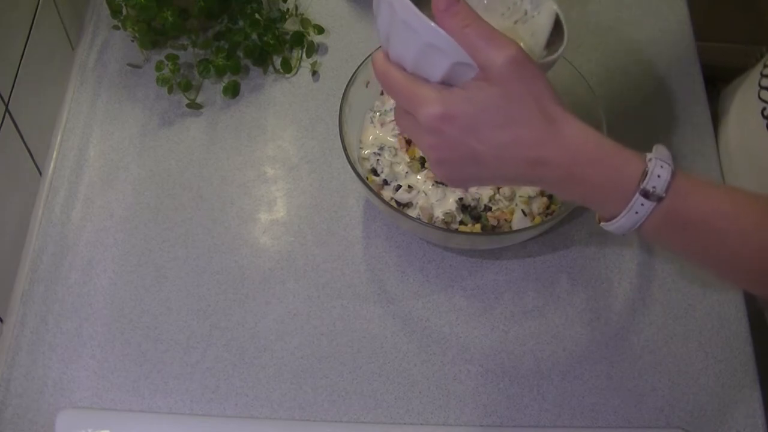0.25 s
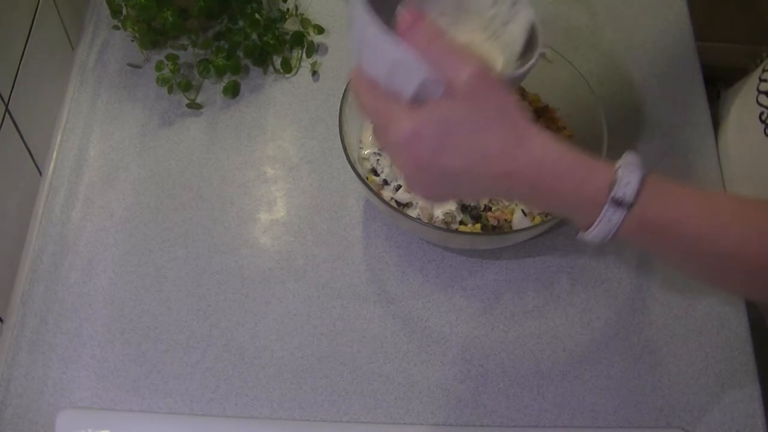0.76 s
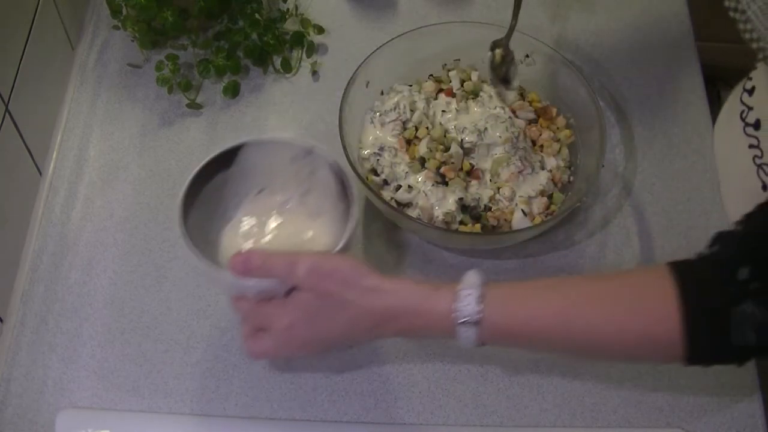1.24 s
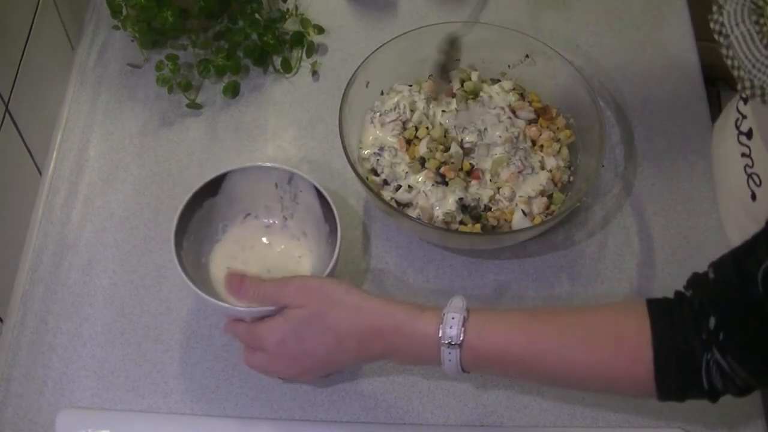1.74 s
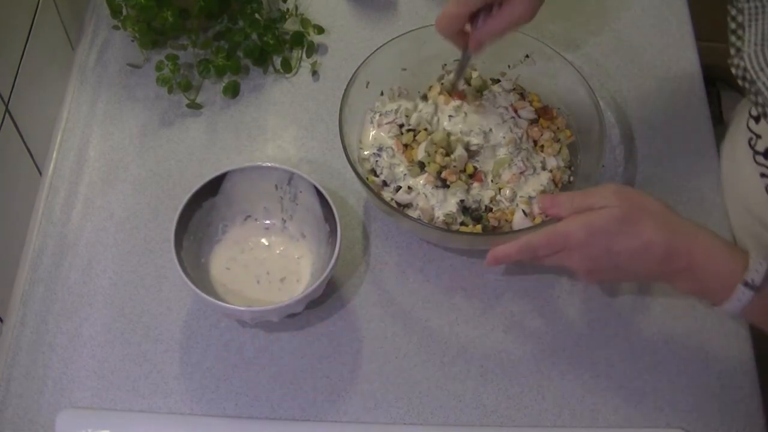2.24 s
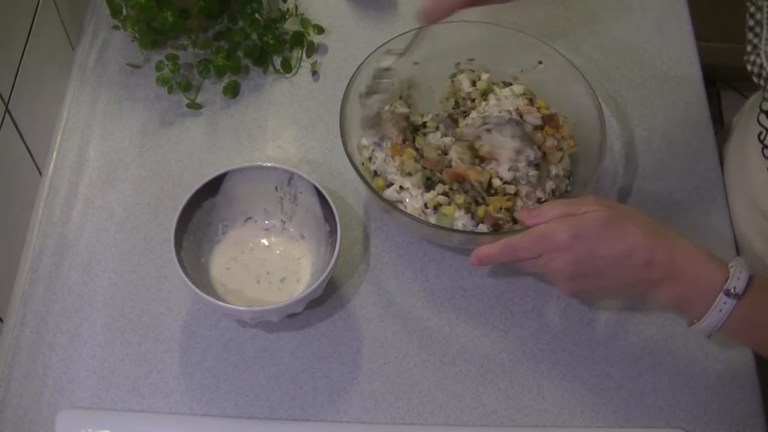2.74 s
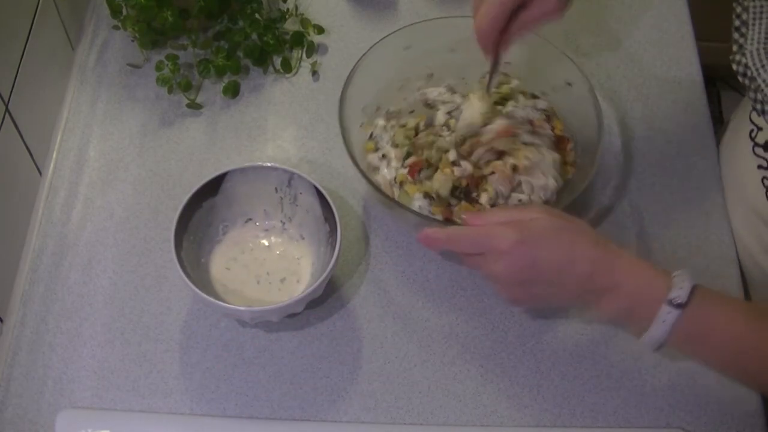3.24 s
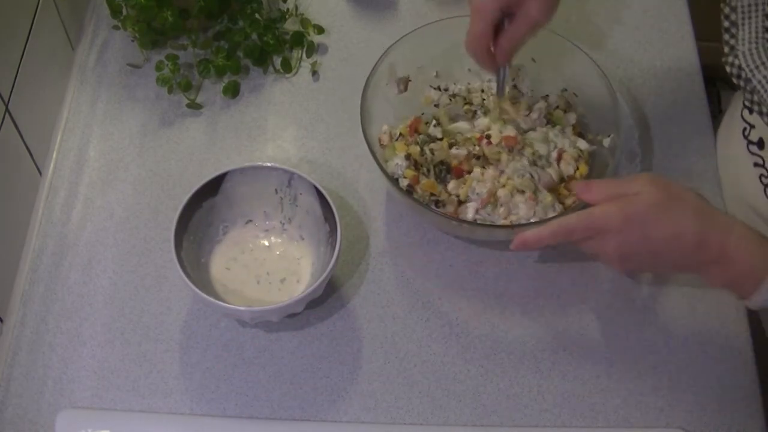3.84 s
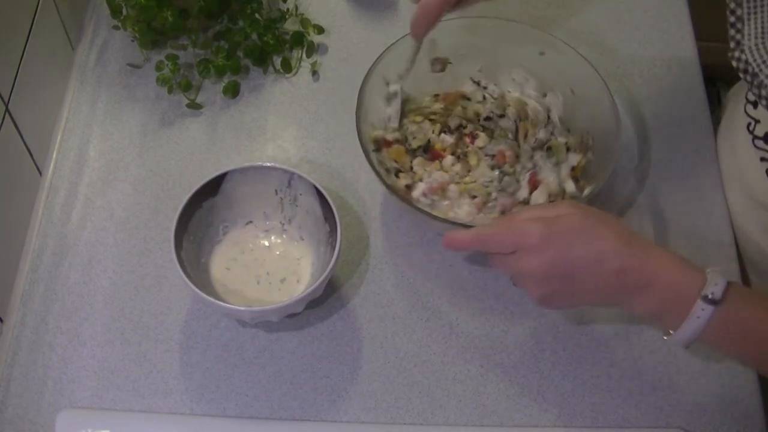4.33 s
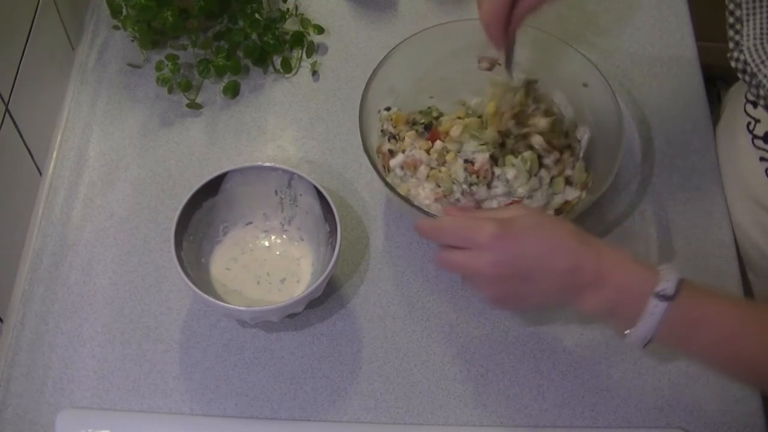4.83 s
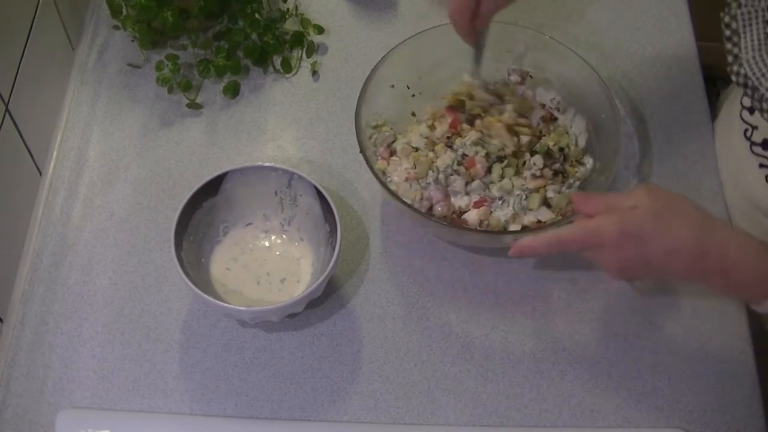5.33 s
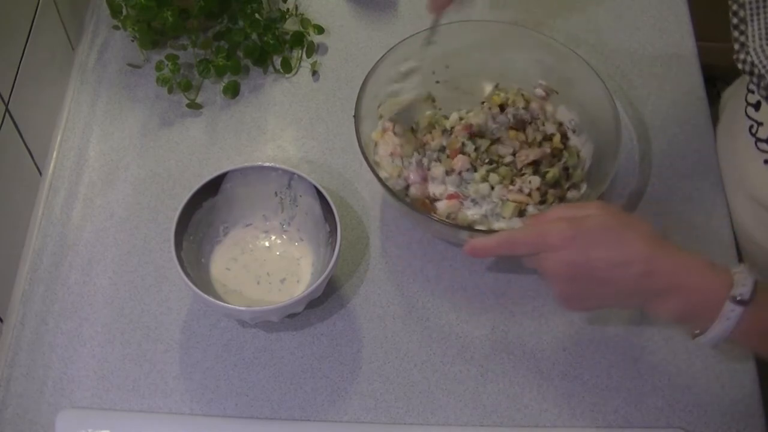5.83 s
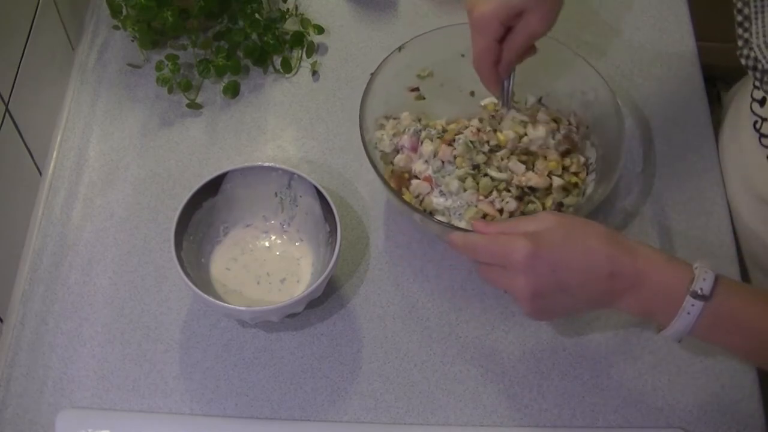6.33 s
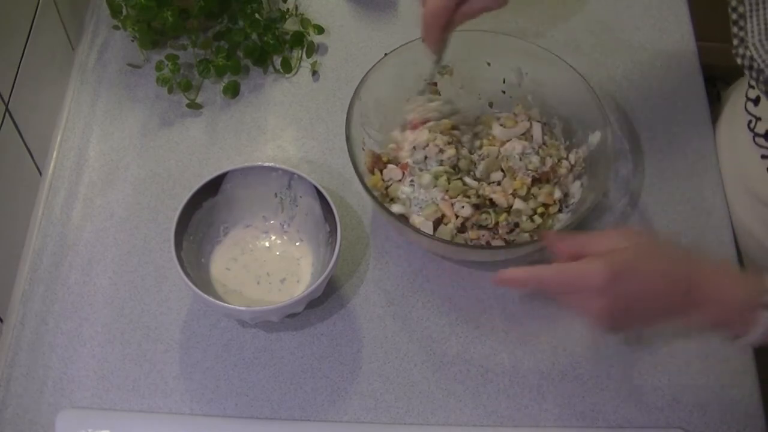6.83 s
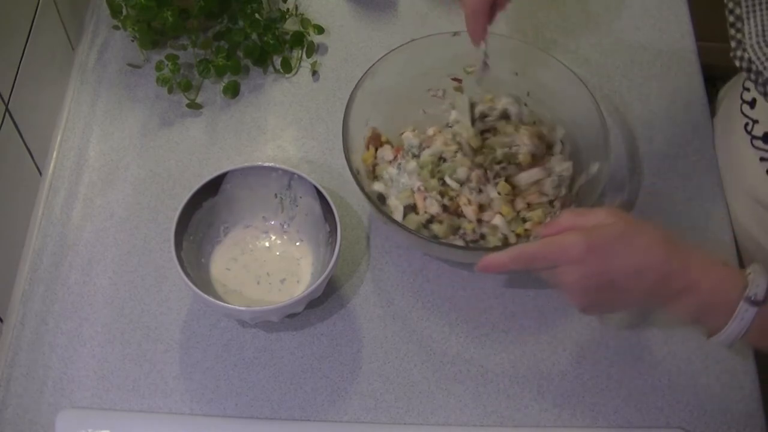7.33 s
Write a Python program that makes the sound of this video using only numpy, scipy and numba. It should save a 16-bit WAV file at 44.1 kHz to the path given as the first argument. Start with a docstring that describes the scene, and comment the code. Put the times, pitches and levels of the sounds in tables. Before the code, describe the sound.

At about 0.6 seconds a metal spoon taps a sauce bowl several times in quick succession, with a short ring, followed by two faint ticks. At 1.6 seconds the bowl lands and rocks on the worktop: two firm hollow knocks and a softer third. From 1.9 seconds the spoon stirs chopped salad in a glass bowl. Ringing clinks come at 1.9 and, faintly, 3.5 seconds, then more strongly at 4.4, 5.2 and 6.7 seconds, with dry ticks between them. The spoon scrapes down the glass in short, rasping squeals that fall in pitch, around 2.2, 2.9, 3.8, 4.4, 5.2, 6.0 and 6.9 seconds; the one at 6 seconds is longest and full of clicks. The wet salad squelches softly with each turned spoonful until the end, near 7.7 seconds. Everything sounds fairly close, with short, bright kitchen reverberation and faint microphone hiss.

```python
"""A chopped salad is dressed and stirred in a glass bowl in a bright-sounding kitchen.
First a metal spoon taps the sauce bowl, which rings; at 1.6 s that bowl lands and rocks on the worktop.
From 1.9 s the spoon stirs: it clinks on the glass and scrapes down the wall in stick-slip,
its squeal sinking as it digs in. Between strokes the wet salad squelches."""
import sys
import numpy as np
from scipy import signal
from scipy.fft import rfft, irfft, next_fast_len
from scipy.io import wavfile
from scipy.ndimage import uniform_filter1d
from numba import njit

SR = 44100
rng = np.random.default_rng(int(sys.argv[2]) if len(sys.argv) > 2 else 0)


def unload_audio(sound):
    """Save the sound as a 16-bit wav file, at the path given as the first command line argument."""
    columns = np.transpose(np.atleast_2d(sound))
    # keep every value between -1 and 1, then stretch to whole-number steps
    steps = np.round(np.clip(columns, -1, 1) * 32767)
    wavfile.write(sys.argv[1], SR, steps.astype(np.int16))


N = 333837
TIME_S = np.arange(N) / SR
RING_TIME_S = TIME_S[:SR * 3 // 4]

# spoon on sauce bowl: start_s, ring_db, ring_tilt_db_per_oct, t60_ratio, crack_db, crack_tilt_db_per_oct
SAUCE_TAPS = [(0.6105, -21.5, -14, .9, -6.5, -0.5), (0.7022, -25, 0.5, 1.0, -14, -3),
              (0.753, -39, 6.5, .9, -17, -5), (0.768, -36, 5.5, .8, -21, 4)]
# spoon clinks on the glass bowl; the last row is the previous clink's ring swelling again:
# start_s, ring_db, ring_tilt_db_per_oct, t60_ratio, crack_db, crack_tilt_db_per_oct
GLASS_RINGS = [(1.9189, -24.5, -13.5, .65, -9.5, -9), (3.5421, -33.5, -4, .8, -13, 1.5),
               (4.3528, -14, -2.5, .6, -0.5, 7.5), (5.1513, -20, -2, .6, -5, 6.5),
               (6.7435, -16.5, 4, .7, 0, 7), (6.798, -19, -0.5, .7, -42, 5)]
# sauce bowl landing and rocking: start_s, level_db, tilt_db_per_oct
KNOCKS = [(1.6476, 7.5, -0.5), (1.7114, 7.5, -2), (1.789, -2.5, -2.5)]
# spoon contact spectrum: freq_hz, level_db
TICK_SPECTRUM = [(40, -43.5), (130, -64), (350, -22.5), (950, -21), (1320, -6.5), (2100, 3.5), (3000, 10),
                 (4000, 5), (5600, 2.5), (6700, -11), (8000, -5.5), (9500, -20), (11000, -17), (15500, -30)]


def from_db(db):
    """Decibels to gain."""
    return 10 ** (np.asarray(db) / 20)


def rms_one(x):
    """Scale to rms 1."""
    return x / np.sqrt(np.mean(x ** 2) + 1e-20)


def at_hz(points, hz):
    """Read a spectrum on a log-frequency axis."""
    freq_hz, value = np.transpose(points)
    return np.interp(np.log(hz + 1e-9), np.log(freq_hz), value)


def add(track, start_s, sound):
    """Mix a sound in at start_s."""
    start = round(start_s * SR)
    track[start:start + len(sound)] += sound[:N - start]


def colour(x, points, tilt_db_per_oct=0, size=4096):
    """Minimum-phase filter of unit energy with the given spectrum and tilt."""
    hz = np.maximum(np.fft.rfftfreq(size, 1 / SR), 10)
    cepstrum = irfft(np.log(from_db(at_hz(points, hz) + tilt_db_per_oct * np.log2(hz))))
    cepstrum[size // 2:] = 0
    cepstrum[0] = 0
    response = irfft(np.exp(2 * rfft(cepstrum)))
    return signal.fftconvolve(x, response / np.linalg.norm(response))[:len(x)]


def equalise(x, points):
    """Zero-phase gain in dB by frequency."""
    size = next_fast_len(len(x))
    gain = from_db(at_hz(points, np.fft.rfftfreq(size, 1 / SR)))
    return irfft(rfft(x, size) * gain, size)[:len(x)]


def low_cut(x, hz):
    """High-pass: keeps the bass out of a sound."""
    return signal.sosfilt(signal.butter(2, hz, "high", fs=SR, output="sos"), x)


def held(start_s, length_s, attack_s, release_s):
    """Attack, hold and release of height 1."""
    age_s = TIME_S - start_s
    return np.clip(age_s / attack_s, 0, 1) * np.clip(1 - (age_s - length_s) / release_s, 0, 1)


def wander(hz):
    """Random drift below hz, rms 1."""
    return rms_one(signal.sosfilt(signal.butter(2, hz, fs=SR, output="sos"), rng.standard_normal(N)))


def grains(per_s, spread_db):
    """Random clicks of unequal size, rms 1."""
    sizes = from_db(spread_db * np.minimum(rng.exponential(1, N), 4)) * rng.choice([-1, 1], N)
    return rms_one(sizes * (rng.random(N) < per_s / SR))


def evened(x, window_s):
    """Hold the slow level at 1, keep the fine grain."""
    return x / np.sqrt(np.abs(uniform_filter1d(x ** 2, int(window_s * SR))) + 1e-12)


@njit
def gliding_resonance(x, hz, width_hz):
    """Two-pole resonance with a moving centre."""
    out, state = np.zeros(len(x)), 0j
    for i in range(len(x)):
        state = state * np.exp((2j * np.pi * hz[i] - np.pi * width_hz) / SR) + x[i]
        out[i] = state.real
    return out


def ringing(onsets, modes, pivot_hz, vary_db):
    """Each onset rings all modes, with its own decay and its own tilt above pivot_hz."""
    out = np.zeros(N)
    hz, mode_db, t60_s = np.transpose(modes)[:, :, None]
    octaves = np.log2(np.maximum(hz / pivot_hz, 1))
    for start_s, level_db, tilt_db_per_oct, t60_ratio, *_ in onsets:
        gain_db = level_db + mode_db + tilt_db_per_oct * octaves + vary_db * rng.standard_normal(hz.shape)
        waves = rng.choice([-1, 1], hz.shape) * np.sin(2 * np.pi * hz * RING_TIME_S)
        decay_db = 60 * RING_TIME_S / (t60_s * t60_ratio)
        add(out, start_s, np.sum(waves * from_db(gain_db - decay_db), axis=0))
    return out


def contacts(blows, spectrum, rattle_db, rattle_t60_s):
    """A sharp crack, then the brief jangle of many damped modes."""
    out = np.zeros(N)
    for start_s, level_db, tilt_db_per_oct in blows:
        burst = rng.standard_normal(len(RING_TIME_S)) * from_db(-60 * RING_TIME_S / rattle_t60_s)
        burst = from_db(rattle_db) * burst / np.linalg.norm(burst)
        burst[0] = 1   # the crack
        add(out, start_s, from_db(level_db) * colour(burst, spectrum, tilt_db_per_oct))
    return out


def microphone_hiss(level_db):
    """Each microphone adds its own faint noise."""
    # noise floor: freq_hz, level_db
    hiss_spectrum = [(15, -32), (25, -33), (126, -21), (233, -6.5), (322, -11.5), (359, -1.5), (410, -11),
                     (804, -15), (970, -16), (1110, -13.5), (1490, -14.5), (2300, -6.5), (2560, -3.5),
                     (3440, -10), (15500, -21.5)]
    return from_db(level_db) * np.array([colour(white, hiss_spectrum)
                                         for white in rng.standard_normal((2, N))])


def diffuse(mid, side):
    """Sound from all around: alike at both microphones in the midrange, less so in the treble."""
    # stereo width: freq_hz, side_over_mid_db
    width = [(40, 0.5), (130, -13), (300, -11.5), (1000, -12), (2500, -12.5), (5000, -4), (8000, -3.5),
             (14000, -2.5)]
    side = equalise(side, width)
    return np.array([mid + side, mid - side])


def kitchen(x, wet_db, build_s=0.00043, gap_s=0.0027):
    """Direct sound plus a dense tail from hard walls that dies sooner in the treble."""
    # room decay before the final taper: freq_hz, t60_s
    room_decay = [(150, 0.31), (500, 0.77), (1500, 0.6), (3000, 0.45), (8000, 0.36), (15000, 0.14)]
    centres_hz, t60s_s = np.transpose(room_decay)
    size = len(RING_TIME_S)
    hz = np.fft.rfftfreq(size, 1 / SR)
    noise = rfft(diffuse(*rng.standard_normal((2, size))))
    tail = sum(irfft(noise * np.interp(hz, centres_hz, band), size) * from_db(-60 * RING_TIME_S / t60_s)
               for band, t60_s in zip(np.eye(len(centres_hz)), t60s_s))
    onset = 1 - np.exp(-np.maximum(RING_TIME_S - gap_s, 0) / build_s)
    spectrum = rfft(tail * onset)
    # densely overlapping room modes favour no pitch
    power = uniform_filter1d(np.abs(spectrum.mean(axis=0)) ** 2, size=18)
    taper = (RING_TIME_S > gap_s) * (1 - RING_TIME_S / RING_TIME_S[-1]) ** 2
    tail = irfft(spectrum / np.sqrt(power), size) * taper
    tail /= np.linalg.norm(tail.mean(axis=0))
    return x + from_db(wet_db) * signal.fftconvolve(x[None], tail, axes=1)[:, :len(x)]


def salad(smack_db, tumble_db, stir_db=-55, settle_db=-59.5):
    """Sauce films part in clusters of tiny smacks, soft pieces tumble; both swell with each spoonful."""
    # spoon in the salad: start_s, end_s
    stirs = [(1.95, 2.37), (2.778, 9)]
    # spoonfuls lifted and turned: start_s, length_s, level_db
    folds = [(2.04, 0.36, -44), (3.191, 0.36, -43), (4.075, 0.46, -49), (4.913, .14, -44.5),
             (5.776, 0.44, -49.5), (6.49, 0.15, -46.5), (7.37, 0.28, -48)]
    # wet smacks: freq_hz, level_db
    smack_spectrum = [(59, -35), (100, -41), (214, -32.5), (275, -23), (378, -11.5), (467, -5.5),
                      (530, -2.5), (1310, -3.5), (1960, 3), (2810, 2.5), (4190, -5), (5510, -4),
                      (15500, -36)]
    # soft bumps: freq_hz, level_db
    bump_spectrum = [(100, -42), (200, -1.5), (420, 5.5), (800, 1), (1500, 2), (4000, -15.5)]
    stirring = sum(held(start_s, end_s - start_s, attack_s=0.022, release_s=0.022)
                   for start_s, end_s in stirs)
    folding = sum(from_db(level_db) * held(start_s, length_s, attack_s=0.056, release_s=0.1)
                  for start_s, length_s, level_db in folds)
    motion = np.hypot(from_db(settle_db) + from_db(stir_db) * stirring, folding)
    clusters = from_db(2 * wander(hz=22))
    smacks = clusters * colour(grains(per_s=1100, spread_db=1.5), smack_spectrum)
    bumps = colour(grains(per_s=300, spread_db=1.5), bump_spectrum)
    tumbling = stirring * (motion / from_db(stir_db)) ** 0.34   # a third of the smacks' swing in dB
    return from_db(smack_db) * motion * smacks + from_db(tumble_db) * tumbling * bumps


def worktop_boom():
    """The worktop rings hollow under each knock."""
    # worktop modes: freq_hz, level_db, t60_s
    modes = [(196.5, -12, 0.23), (256, -8.5, .18), (334, -1.5, 0.19), (405, 3, 0.17), (511, 2.5, 0.18),
             (644, -1, .16), (749, 3, 0.18), (910, 2, .16), (960, 1, .16), (1100, -4, .14)]
    blows = [(start_s, level_db - 40, tilt_db_per_oct, 1) for start_s, level_db, tilt_db_per_oct in KNOCKS]
    return low_cut(ringing(blows, modes, pivot_hz=600, vary_db=1), hz=220)


def sauce_bowl_knocks():
    """The sauce bowl lands and rocks on the worktop."""
    # knock spectrum: freq_hz, level_db
    knock_spectrum = [(53, -60), (90, -34.5), (135, -40.5), (186, -13), (274, -16.5), (332, -5),
                      (468, -12.5), (631, -1), (688, -8.5), (889, 0.5), (1650, -3.5), (2760, 0),
                      (3350, -11.5), (6370, -20), (15000, -49)]
    return contacts(KNOCKS, knock_spectrum, rattle_db=-1, rattle_t60_s=0.012)


def sauce_bowl_ring():
    """The sauce bowl rings under the spoon's taps."""
    # sauce bowl modes: freq_hz, level_db, t60_s
    modes = [(1179, -11, .2), (2229, -11, .13), (2487, -3, .12), (2600, -8, .1), (2961, 0, .12),
             (3040, -8, .1), (3820, -8, .1), (4651, -15, .08), (5310, -5, .18), (5390, -5, .13),
             (6821, -20, .08), (7350, -20, .1), (8200, -22, .12)]
    return low_cut(ringing(SAUCE_TAPS, modes, pivot_hz=2940, vary_db=3), hz=690)


def glass_bowl_ring():
    """The struck glass rings, damped by the spoon staying on it; the last ring swells again."""
    # glass bowl modes: freq_hz, level_db, t60_s
    modes = [(400, -26, .11), (900, -27, .08), (1090, -23, .2), (1838, -8, .27), (2630, -13, .08),
             (2770, 0, .25), (2800, -8, .13), (3600, -13, .09), (3850, -7, .22), (3900, -13, .1),
             (4220, -15, .08), (5040, -12, .24), (5110, -15, .18), (5620, -13, .12), (6400, -15, .22),
             (7290, -16, .14), (7960, -11, .12), (8420, -16, .1), (10800, -26, .07)]
    return low_cut(ringing(GLASS_RINGS, modes, pivot_hz=2400, vary_db=2.5), hz=266)


def spoon_ticks(gain_db):
    """Hard contacts of the spoon: dead catches, and the cracks where it strikes a bowl."""
    # catches that ring no bowl: start_s, level_db, tilt_db_per_oct
    catches = [(1.0286, -33, 4), (1.4103, -28, 13), (2.1617, -21.5, -5.5), (2.2594, -21, -2.5),
               (2.341, -11.5, -7), (2.5446, -33.5, 7), (2.8442, -22, 3), (2.9983, -8.5, -4),
               (3.0044, -3.5, -1.5), (3.678, -23, 1.5), (3.8149, -20.5, -3), (3.8482, -10, -2),
               (4.3582, -13, -7.5), (4.539, -17, 4), (4.6007, -8.5, -2.5), (4.689, -12.5, -2),
               (4.855, -27.5, -1), (5.9607, -17.5, 1), (6.0844, -9, -4), (6.123, -11, -4.5),
               (6.171, -9.5, -6.5), (6.2071, -12, -3.5), (6.2581, -3, -1), (6.316, -10, -5.5),
               (6.8862, -12, 0), (7.0515, -14.5, -1.5), (7.0807, -12, -6), (7.3364, -30, 5.5)]
    cracks = [(start_s, crack_db, tilt_db_per_oct)
              for start_s, *_, crack_db, tilt_db_per_oct in SAUCE_TAPS + GLASS_RINGS]
    ticks = contacts(catches + cracks, TICK_SPECTRUM, rattle_db=12, rattle_t60_s=0.028)
    return from_db(gain_db) * low_cut(ticks, hz=510)


def spoon_strokes(smother_db_per_oct=21, wobble_db=5.1, wobble_oct=0.049, wobble_hz=24):
    """Pitch, squeal gain, rasp gain: the squeal sinks and fades as the spoon digs in; the hand wobbles."""
    # slides down the glass: start_s, length_s, first_hz, last_hz, squeal_db, rasp_db, easing_db_per_s
    strokes = [(2.22, 0.16, 2010, 1490, -33.5, -43.5, 39), (2.835, 0.088, 2880, 2700, -38.5, -60, 21),
               (2.897, 0.1, 2240, 1980, -31, -38, 44), (3.78, 0.1, 2900, 2200, -37.5, -40, 12),
               (4.41, .14, 2670, 2230, -22.5, -34, 9), (4.63, 0.046, 2020, 1600, -43.5, -39.5, 68),
               (5.228, 0.18, 2690, 2180, -20, -30.5, 73), (5.41, .13, 1810, 1580, -42.5, -38.5, 54),
               (5.968, 0.068, 2890, 2720, -24, -41.5, 2), (6.02, 0.295, 2550, 1350, -25, -37.5, 5),
               (6.87, 0.11, 2520, 1960, -25.5, -37, 2), (7.0, 0.13, 2230, 1640, -32.5, -38, 13)]
    pitch_hz = np.full(N, float(strokes[0][2]))
    squeal, rasp = np.zeros((2, N))
    for start_s, length_s, first_hz, last_hz, squeal_db, rasp_db, easing_db_per_s in strokes:
        age_s = np.clip(TIME_S - start_s, 0, length_s)
        glide_hz = first_hz + (last_hz - first_hz) * age_s / length_s
        pitch_hz = np.where(TIME_S >= start_s, glide_hz, pitch_hz)
        eased_db = easing_db_per_s * age_s
        smother_db = smother_db_per_oct * np.log2(first_hz / glide_hz)
        # the tip sings first, then the edge bites
        tip = held(start_s, length_s, attack_s=0.015, release_s=0.02)
        edge = held(start_s, length_s, attack_s=0.038, release_s=0.02)
        squeal += from_db(squeal_db - eased_db - smother_db) * tip
        rasp += from_db(rasp_db - eased_db) * edge
    pressure = from_db(wobble_db * wander(wobble_hz))
    return pitch_hz * 2 ** (wobble_oct * wander(wobble_hz)), squeal * pressure, rasp * pressure


def spoon_scrapes(slips_per_s, unevenness, squeal_db, overtone_db, rasp_db, grit_db, swell_s=0.0009):
    """Stick-slip on the glass: each slip is a swell of friction that feeds two sinking resonances."""
    # edge rasping on glass: freq_hz, level_db
    rasp_spectrum = [(100, -54), (500, -41), (950, -1), (1350, -49.5), (2200, 13.5), (3100, 10),
                     (4200, 14.5), (5300, 6.5), (6500, -4.5), (7700, 8), (9400, -25), (10800, -7.5),
                     (12500, -36), (15500, -11)]
    pitch_hz, squeal_gain, rasp_gain = spoon_strokes()
    gap, strength, shift = rng.standard_normal((N // 20, 3)).T
    slip_samples = (np.cumsum(np.exp(unevenness * gap)) * SR / slips_per_s).astype(int)
    slips = np.bincount(np.minimum(slip_samples, N), from_db(2 * strength), N + 1)[:N]
    pitch_hz *= np.exp(0.035 * np.interp(np.arange(N), slip_samples, shift))   # each slip grips a new spot
    pole = np.exp(-1 / (swell_s * SR))
    friction = signal.lfilter([1], [1, -2 * pole, pole * pole], slips) * rng.standard_normal(N)
    low = high = friction
    for _ in range(2):   # two passes for steep skirts
        low = gliding_resonance(low, pitch_hz, width_hz=560.)
        high = gliding_resonance(high, 2.1 * pitch_hz, width_hz=620.)
    squeal = from_db(squeal_db) * squeal_gain * evened(low, window_s=0.011)
    overtone = from_db(overtone_db) * np.sqrt(squeal_gain * rasp_gain) * evened(high, window_s=0.031)
    rasp = from_db(rasp_db) * rasp_gain * evened(colour(friction, rasp_spectrum), window_s=0.029)
    # the edge catches now and then
    grit = from_db(grit_db) * rasp_gain * colour(grains(per_s=70, spread_db=-2), TICK_SPECTRUM)
    return squeal + overtone + rasp + grit


def scene():
    """All sources in the kitchen's reverberation, over microphone hiss."""
    taps = sauce_bowl_ring()
    glass = glass_bowl_ring()
    ticks = spoon_ticks(gain_db=-6)
    knocks = sauce_bowl_knocks()
    scrapes = spoon_scrapes(slips_per_s=230, unevenness=0.45,
                            squeal_db=-8.5, overtone_db=-13, rasp_db=-5.5, grit_db=-7.5)
    return (kitchen(taps, wet_db=-5.5) + kitchen(glass, wet_db=-2.5)
            + kitchen(ticks, wet_db=-1.5) + kitchen(scrapes, wet_db=-1.5)
            + kitchen(knocks, wet_db=2) + kitchen(worktop_boom(), wet_db=-4)
            + kitchen(salad(smack_db=-10, tumble_db=-69), wet_db=1.5)
            + microphone_hiss(level_db=-58.5))


def record(dry):
    """The left microphone is a little brighter; peaks are rounded and the top is cut."""
    # left over right microphone: freq_hz, gain_db
    left_treble = [(100, 0), (4000, -.3), (8000, 2.0), (15000, 1.0)]
    cutoff_hz = 16000
    rounded = np.tanh([equalise(dry[0], left_treble), dry[1]])
    return signal.sosfilt(signal.ellip(10, 0.1, 80, cutoff_hz, fs=SR, output="sos"), rounded)


dry = scene()
out = record(dry)
unload_audio(out)
```